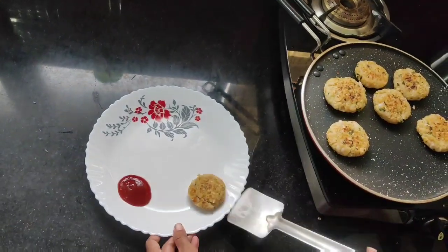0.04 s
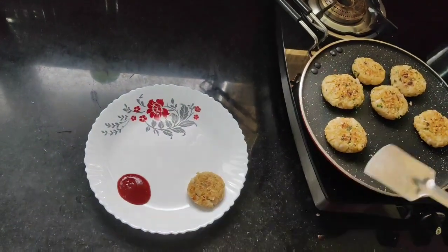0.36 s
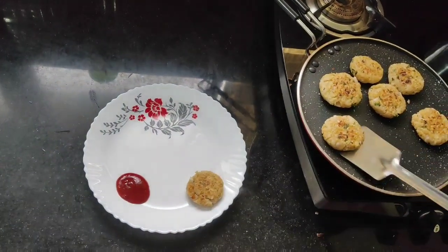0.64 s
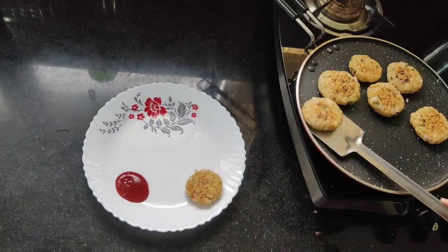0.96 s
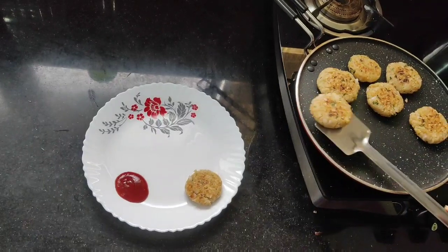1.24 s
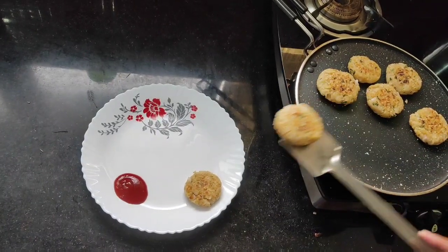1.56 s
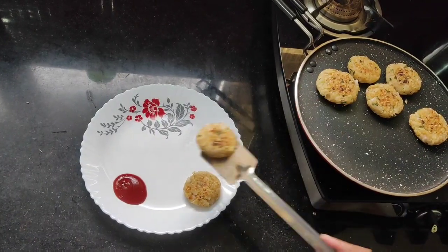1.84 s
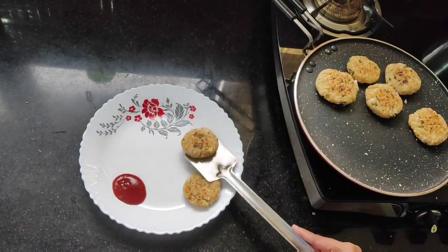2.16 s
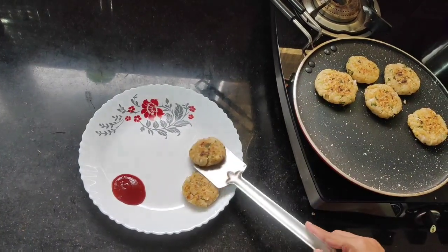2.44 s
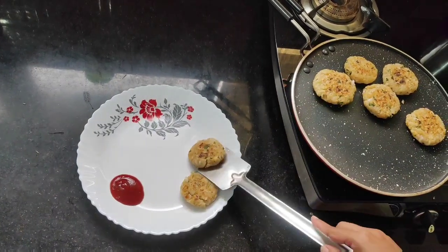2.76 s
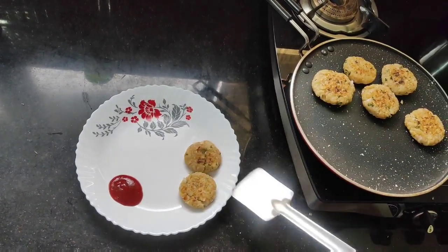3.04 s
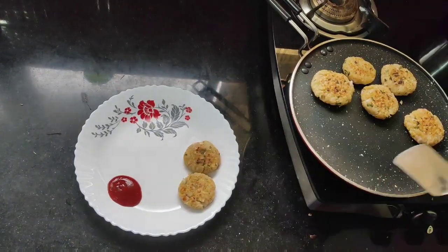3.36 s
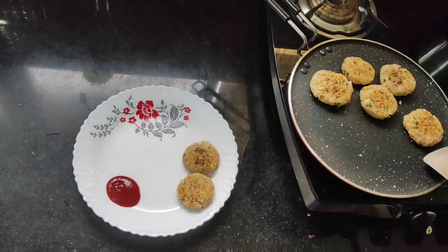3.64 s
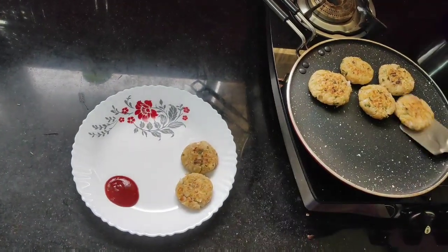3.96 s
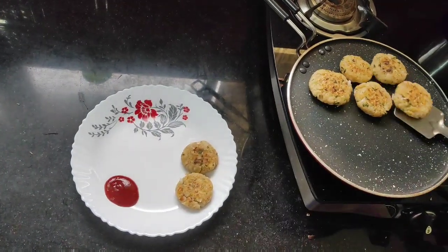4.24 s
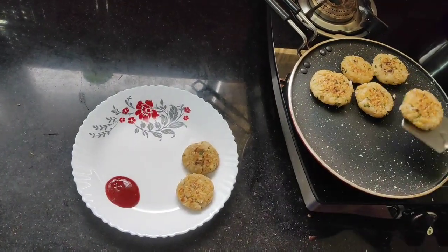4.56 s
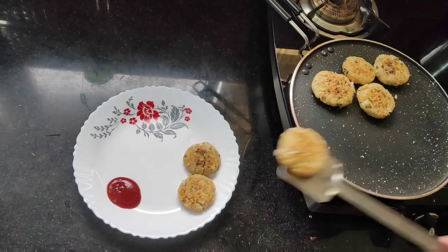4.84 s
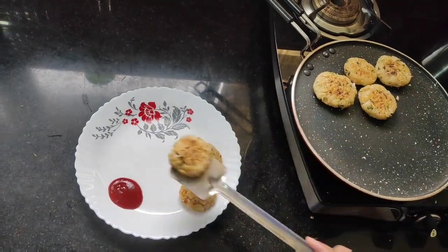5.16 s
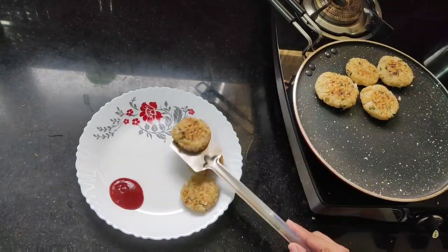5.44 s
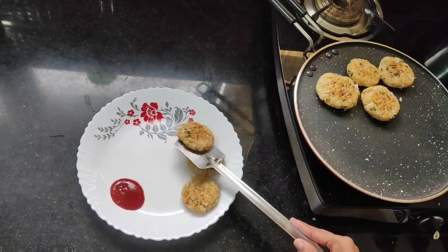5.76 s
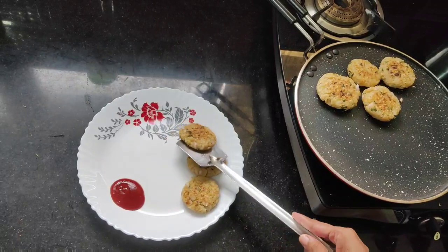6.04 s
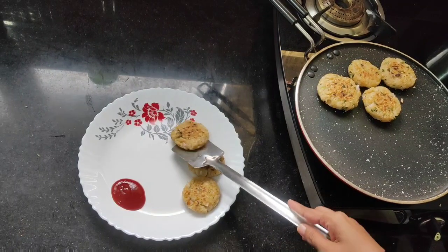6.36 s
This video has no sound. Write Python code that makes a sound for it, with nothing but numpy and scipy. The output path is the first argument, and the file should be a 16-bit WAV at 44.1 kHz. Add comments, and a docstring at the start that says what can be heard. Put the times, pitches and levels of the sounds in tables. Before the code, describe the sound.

A steel spatula clinks lightly on a plate right at the start. At about 0.5 seconds it lands in a non-stick pan with a sharp, ringing clack, then scrapes under a patty with faint squeaks until 1 second. After a lull, a quick cluster of bright clinks comes at 2.2 to 2.4 seconds, the last ones loudest, as the plate rocks and knocks on the stone counter. The blade slides quietly over the plate around 2.5 and 3 seconds. From 3.7 to 4.1 seconds it taps the pan and scrapes again, squeakier now, followed by a tiny tick at 4.5. A lighter plate clink and soft knock come at 5.9 seconds. Soft, dull handling rubs lie between the strokes. Everything sounds close, with the short reverberation of a small hard-walled kitchen, over a low rumble, electrical hum and thin steady hiss.

```python
"""Light clinks on a glass-ceramic plate, then a sharp clack as a steel spatula lands in a non-stick pan.
The blade scrapes and squeaks under fried patties and sets them on the plate, which knocks on the stone
counter. Each blow is a noisy clack plus ringing modes; each scrape is a stream of tiny slips that keeps
those modes ringing. Soft handling rubs lie between the strokes. It all sounds in a small hard-walled
kitchen, over a low room rumble, mains hum and a thin steady hiss."""
import sys
import numpy as np
from scipy import signal
from scipy.fft import rfft, irfft
from scipy.io import wavfile

SR = 44100
rng = np.random.default_rng(int(sys.argv[2]) if len(sys.argv) > 2 else 0)


def put_to_file(sound):
    """Save the sound as 16-bit audio at rate SR, in the file named by the first command-line argument."""
    columns = np.atleast_2d(sound).T  # one column per channel
    safe = np.clip(columns, -1, 1)
    whole_steps = np.round(safe * 32767)
    wavfile.write(sys.argv[1], SR, whole_steps.astype(np.int16))


N = 282240
TIME = np.arange(N) / SR

# Table levels are relative: layer trims and the mix faders come on top.
# slow drift of the room rumble: time_s, level_db
RUMBLE_LEVEL = [(0.0, -61), (0.5, -62), (1.34, -64), (2.51, -65), (3.3, -67), (4.24, -62), (6.4, -61.5)]
# spectra of the rumble and the hiss: frequency_hz, level_db
RUMBLE_COLOUR = [(20, -18.5), (45, -16), (80, -11), (100, 3), (130, -1), (190, 3), (270, -4.5), (390, -5),
                 (470, -23.5), (600, -32), (1500, -49.5)]
HISS_COLOUR = [(300, -74), (700, -19.5), (1500, -18.5), (2600, -12.5), (3450, -14), (3950, -26),
               (4600, -16), (5200, -10), (5550, -3), (6600, 2), (7550, -4.5), (7950, -33.5), (10500, -15.5),
               (13000, -34)]
# blade strikes plate or pan: start_s, ring_db, clack_db, tilt_db_per_octave, favoured_hz, boost_db
PLATE_HITS = [(0.012, -47.5, -49, 2, 5430, 3), (0.0366, -45.5, -41.5, 1.5, 5130, 1),
              (0.069, -54, -50, 5, 4540, 11), (2.2283, -36, -36, -1, 1300, 13),
              (2.243, -40, -30.5, -5, 1240, 4.5), (2.3453, -31, -30.5, -3.5, 4900, -6),
              (2.3472, -21.5, -27.5, -0.5, 6550, 5.5), (2.359, -34.5, -37, 8, 2720, 2),
              (5.902, -37.5, -42.5, 0.5, 3930, 7), (5.919, -55, -44, -6.5, 2040, 12)]
PAN_HITS = [(0.5099, -21, -24.5, 1, 5700, 0.5), (0.519, -28.5, -27, -1.5, 4170, 7),
            (0.563, -31.5, -47, 0.5, 2600, 6), (0.572, -31.5, -40, 0, 6600, -4),
            (3.733, -40, -46, 0, 3800, 7), (3.746, -53, -48, -8.5, 3500, -9),
            (4.0164, -45, -33.5, -1, 3560, 13), (4.026, -41.5, -40.5, -4.5, 3620, 2),
            (4.068, -45.5, -38, -3.5, 3640, 3)]
# plate or pan ringing together with the blade: pitch_hz, level_db, t60_s
PLATE_MODES = [(775, -19, .12), (945, -10, .08), (1184, -10, .11), (1308, -5, .08), (1803, -19, .1),
               (2070, -16, .1), (2365, -12, .13), (2560, -14, .08), (3068, -17, .1), (3795, -12.5, .11),
               (4167, -8, .11), (4258, -8, .12), (4900, -3, .09), (4942, -6, .1), (5545, -8, .1),
               (5943, -12, .1), (6220, -8, .09), (6391, -4, .16), (6490, -1.5, .16), (6620, -6, .16),
               (6685, -7, .15), (7590, -11, .1), (8900, -22, .08), (9430, -23, .08), (10400, -13, .09),
               (11450, -23, .1), (12900, -23, .08)]
PAN_MODES = [(506, -12, .25), (899, -11, .16), (1066, -15, .12), (1254, -11, .1), (1700, -15, .12),
             (1960, -17, .1), (2300, -12, .08), (2570, -5.5, .14), (2620, -9, .08), (2767, -12, .1),
             (3000, -14, .1), (3220, -16, .1), (3535, -7, .14), (3750, -13, .08), (3962, -9, .09),
             (4097, -2, .11), (4185, -8, .07), (4640, -8, .1), (4715, -6, .12), (4950, -12, .08),
             (5250, -12, .08), (5600, -10, .05), (6383, -3, .1), (6485, -1, .12), (6595, -2, .09),
             (6684, -4, .11), (7235, -7, .1), (7400, -6, .07), (10500, -18, .08)]
# crowd of short-lived modes under each contact: frequency_hz, level_db
PLATE_CLACK = [(100, -31), (300, 7.5), (600, -10.5), (1100, 0), (1900, -2), (2700, 5), (3350, -6.5),
               (4100, 1.5), (5500, 6.5), (6500, 4), (7600, 0), (8300, -12.5), (10300, -8), (13000, -25)]
PAN_CLACK = [(100, -36), (300, 6.5), (650, -4), (1050, 3.5), (2000, -1), (3050, 8.5), (3300, -9),
             (3650, 5.5), (4400, 1.5), (5000, 5), (6300, 3.5), (7500, 7), (8100, -11.5), (13000, -11.5)]
# blade drawn over the plate or pushed over the pan: start_s, length_s, end_level_db
PLATE_STROKES = [(.04, 0.022, -49), (2.46, 0.065, -55.5), (2.85, 0.15, -56), (3.06, 0.12, -64.5),
                 (3.5, 0.058, -64), (5.92, 0.018, -52), (6.24, .15, -76)]
PAN_STROKES = [(.555, .02, -39.5), (.67, 0.18, -48), (.93, 0.087, -61), (3.735, 0.011, -46),
               (3.81, 0.14, -44.5), (4.0, .11, -51.5)]
# plate rocks on the counter: start_s, level_db
KNOCKS = [(2.231, -35), (2.276, -42), (2.349, -35), (3.005, -49.5), (5.905, -44.5)]
# low ring of the rocking plate: pitch_hz, level_db, t60_s
KNOCK_MODES = [(271, -3.5, 0.25), (307, 7, 0.21), (393.3, -5.5, 0.21)]
# soft rubs of food, blade and hand: start_s, length_s, level_db, favoured_hz
RUBS = [(0.016, 0.18, -67, 600), (0.189, 0.15, -60, 594), (.95, 0.08, -63, 316), (1.071, 0.024, -53, 850),
        (2.6, 0.13, -65, 1220), (2.954, 0.41, -65, 612), (3.5, 0.17, -62, 636), (4.36, 0.072, -52.5, 607),
        (4.485, 0.019, -61, 540), (4.59, 0.11, -70, 174), (5.039, 0.078, -55.5, 930),
        (5.192, 0.18, -72, 1120), (5.485, 0.077, -73.5, 530), (5.766, 1, -66, 280)]
# dull spectrum of a rub: frequency_hz, level_db
RUB_COLOUR = [(80, -7.5), (150, 9), (320, 7.5), (450, 1.5), (600, -13.5), (950, -20.5), (1250, -4.5),
              (1600, -22.5), (3000, -33), (6000, -60)]
# the edge sticks and slips in step with one mode: start_s, length_s, pitch_hz, level_db
SQUEAKS = [(.77, .1, 1700, -59), (.78, .1, 2590, -56), (.82, .04, 3750, -57), (2.85, .045, 2070, -60),
           (2.875, .06, 4170, -64), (2.94, .1, 2330, -65), (3.74, .28, 2590, -54), (3.92, .08, 2570, -49),
           (3.88, .13, 1700, -55), (3.87, .14, 515, -56), (3.915, .04, 6620, -52)]
# reverb tail of the kitchen: band_hz, t60_s
KITCHEN_T60 = [(150, 0.4), (500, 0.59), (1500, 0.65), (4000, 0.56), (7000, 0.41), (13000, 0.58)]


def from_db(db):
    """Decibels to gain."""
    return 10 ** (np.asarray(db) / 20)


def rms_one(x):
    """Scale to unit power."""
    return x / np.sqrt(np.mean(x ** 2) + 1e-20)


def at_hz(points, hz):
    """Read a table on a log-frequency axis."""
    points = np.array(points)
    return np.interp(np.log(np.maximum(hz, 1)), np.log(points[:, 0]), points[:, 1])


def add(track, start_s, sound):
    """Drop a sound onto a track."""
    start = max(round(start_s * SR), 0)
    track[start:start + len(sound)] += sound[:N - start]


def contact_eq(hz, tilt_db_per_octave=0, favoured_hz=1, boost_db=0, width_octaves=.17):
    """Hard contacts are bright, cushioned ones dark; modes with an antinode at the spot get more."""
    tilt_db = tilt_db_per_octave * np.log2(np.clip(hz, 700, 14000) / 4000)
    octaves_off = np.log2(np.maximum(hz, 1) / favoured_hz)
    bell = np.exp(-.5 * (octaves_off / width_octaves) ** 2)
    return from_db(tilt_db + boost_db * bell)


def coloured(x, colour, *contact):
    """EQ a signal with a spectrum table and an optional contact; unit power."""
    hz = np.arange(len(x) // 2 + 1) * SR / len(x)
    eq = from_db(at_hz(colour, hz)) * contact_eq(hz, *contact)
    return rms_one(irfft(rfft(x) * eq, len(x)))


def room_tone(trim_db=1, hum_db=-72, hum_hz=102.3):
    """The low bed: a slowly drifting noise rumble and a sine of mains hum."""
    drift = from_db(trim_db + np.interp(TIME, *np.transpose(RUMBLE_LEVEL)))
    rumble = drift * coloured(rng.standard_normal(N), RUMBLE_COLOUR)
    hum = from_db(hum_db) * np.sqrt(2) * np.sin(2 * np.pi * hum_hz * TIME)
    return rumble + hum


def hiss():
    """The high bed: thin, steady noise."""
    return from_db(-60.5) * coloured(rng.standard_normal(N), HISS_COLOUR)


def swell(rise_s):
    """Vibration takes a moment to spread through a body."""
    return 1 - np.exp(-TIME[:SR // 2] / rise_s)


def ringing(modes, *contact, detune=0.00426):
    """Struck modes ring down, each beating against a weaker twin detuned by the load of blade and food."""
    hz, db, t60 = np.transpose(modes)
    strength = from_db(db + rng.standard_normal(len(hz))) * contact_eq(hz, *contact)
    twin_hz = hz * (1 + detune * rng.standard_normal(len(hz)))
    polarity = rng.choice([-1, 1], len(hz))
    t = TIME[:SR // 2, None]
    pairs = .8 * np.sin(2 * np.pi * hz * t) + .6 * np.cos(2 * np.pi * twin_hz * t)
    return (from_db(-60 * t / t60) * pairs) @ (strength * polarity)


def clack(colour, contact, t60_s):
    """Dense, heavily damped modes merge into a short burst of noise."""
    decay = from_db(-60 * TIME[:SR // 2] / t60_s)
    return decay * coloured(rng.standard_normal(SR // 2), colour, *contact)


def blows(hits, modes, colour, ring_trim_db, clack_t60_s, rise_s):
    """Every blow layers a clack with the ring of the body."""
    out = np.zeros(N)
    for start_s, ring_db, clack_db, *contact in hits:
        ring = from_db(ring_db + ring_trim_db) * ringing(modes, *contact)
        burst = from_db(clack_db) * clack(colour, contact, clack_t60_s)
        add(out, start_s, swell(rise_s) * (ring + burst))
    return out


def stroke(start_s, length_s, attack_s, hold_db_per_s, release_db_per_s):
    """Envelope of one hand move: attack, sloping hold, release."""
    past_end = TIME - start_s - length_s
    attack = np.clip((TIME - start_s) / attack_s, 0, 1)
    hold_db = hold_db_per_s * np.clip(past_end, -length_s, 0)
    release_db = release_db_per_s * np.clip(past_end, 0, 1)
    return attack * from_db(hold_db - release_db)


def scrape(strokes, modes, colour, ring_db, grit_db, slips_per_s=5000, slip_spread_db=2.5):
    """Tiny uneven slips of the blade make grit and keep the modes ringing."""
    sizes = from_db(slip_spread_db * np.minimum(rng.exponential(1, N), 4))
    slips = (rng.random(N) < slips_per_s / SR) * rng.choice([-1, 1], N) * sizes
    ring = np.zeros(N)
    for hz, db, t60 in modes:
        pressed_t60 = 0.29 * t60  # a pressed blade rings shorter
        radius, angle = from_db(-60 / (pressed_t60 * SR)), 2 * np.pi * hz / SR
        feedback = [1, -2 * radius * np.cos(angle), radius ** 2]
        ring += from_db(db) * signal.lfilter([0, np.sin(angle)], feedback, slips)
    pressure = np.zeros(N)
    for start_s, length_s, db in strokes:  # each bites, grows as the hand presses on, then lets go
        push = stroke(start_s, length_s, attack_s=0.011, hold_db_per_s=61, release_db_per_s=192)
        pressure += from_db(db) * push
    return pressure * (from_db(ring_db) * rms_one(ring) + from_db(grit_db) * coloured(slips, colour))


def plate():
    """The blade clinks on the plate and slides out from under the patty; the pressed plate rocks."""
    out = scrape(PLATE_STROKES, PLATE_MODES, PLATE_CLACK, ring_db=-10.5, grit_db=-2)
    for start_s, db in KNOCKS:
        add(out, start_s, from_db(db) * swell(rise_s=0.016) * ringing(KNOCK_MODES))
    clinks = blows(PLATE_HITS, PLATE_MODES, PLATE_CLACK,
                   ring_trim_db=-6.5, clack_t60_s=0.07, rise_s=0.00051)
    return out + clinks


def handling(lumps_per_s=1200, boost_db=10.5):
    """Food and hand shift with dull, lumpy rubs that come in softly, ease off and fade."""
    lumps = (rng.random(N) < lumps_per_s / SR) * rng.uniform(-1.13, 1, N)
    out = np.zeros(N)
    for start_s, length_s, db, favoured_hz in RUBS:
        envelope = stroke(start_s, length_s, attack_s=0.017, hold_db_per_s=-2, release_db_per_s=183)
        out += from_db(db) * envelope * coloured(lumps, RUB_COLOUR, 0, favoured_hz, boost_db)
    return out


def pan():
    """The blade lands on the pan, bounces and slides under a patty."""
    slide = scrape(PAN_STROKES, PAN_MODES, PAN_CLACK, ring_db=-5, grit_db=-8)
    clacks = blows(PAN_HITS, PAN_MODES, PAN_CLACK, ring_trim_db=-9, clack_t60_s=0.082, rise_s=0.00026)
    return slide + clacks


def squeaks(width_hz=85):
    """Friction feeds one narrow resonance for a moment."""
    out = np.zeros(N)
    for start_s, length_s, hz, db in SQUEAKS:
        band = signal.butter(2, [hz - width_hz / 2, hz + width_hz / 2], "band", fs=SR, output="sos")
        arch = np.hanning(round(length_s * SR))
        tone = signal.sosfilt(band, rng.standard_normal(SR))[-len(arch):]
        add(out, start_s, from_db(db) * arch * rms_one(tone))
    return out


def tick(start_s=4.4722):
    """One tiny, bright pop of hot oil by the pan."""
    out = np.zeros(N)
    contact = (2, 6000, 3)  # tilt_db_per_octave, favoured_hz, boost_db
    add(out, start_s, from_db(-39.5) * clack(PAN_CLACK, contact, t60_s=0.013))
    return out


def kitchen(x, predelay_s=0.0034):
    """Diffuse reflections come off the hard walls and die away band by band."""
    t, hz = TIME[:SR], np.arange(SR // 2 + 1)
    white = rfft(rng.standard_normal(SR))
    tail = np.zeros(SR)
    for band_hz, t60 in KITCHEN_T60:
        band = at_hz([(f, float(f == band_hz)) for f, _ in KITCHEN_T60], hz)
        tail += irfft(white * band, SR) * from_db(-60 * t / t60)
    tail *= np.clip(t / predelay_s - 1, 0, 1)
    return signal.fftconvolve(x, tail / np.sqrt(np.sum(tail ** 2)))[:N]


def scene(direct_db=-0.5, reverb_db=-4.5, side_db=-14):
    """The mix sits in the centre; only the treble of the reverb and hiss spreads a little."""
    foley = pan() + plate() + squeaks() + handling() + tick()
    bed = room_tone()
    mid = from_db(direct_db) * foley + from_db(reverb_db) * kitchen(foley) + bed + hiss()
    highpass = signal.ellip(8, .5, 70, 4600, "high", fs=SR, output="sos")
    side = from_db(side_db) * signal.sosfilt(highpass, kitchen(foley) + hiss())
    return np.array([mid + side, mid - side])


def record(dry):
    """A steep low-pass takes the air off the top."""
    cutoff_hz = 13200
    return signal.sosfilt(signal.ellip(10, .2, 70, cutoff_hz, fs=SR, output="sos"), dry)


dry = scene()
out = record(dry)
put_to_file(out)
```